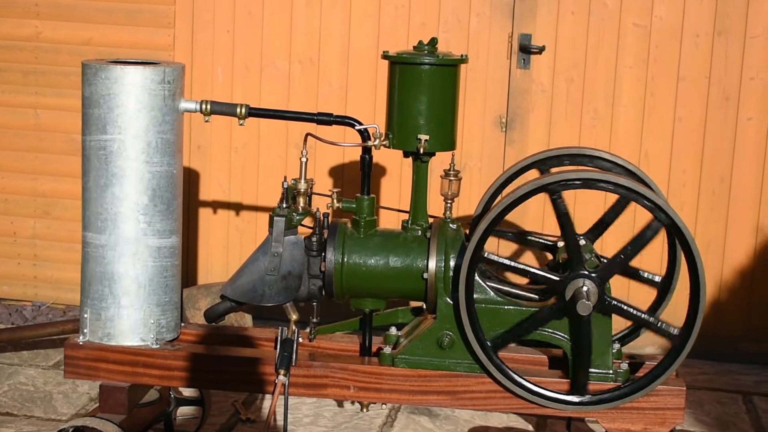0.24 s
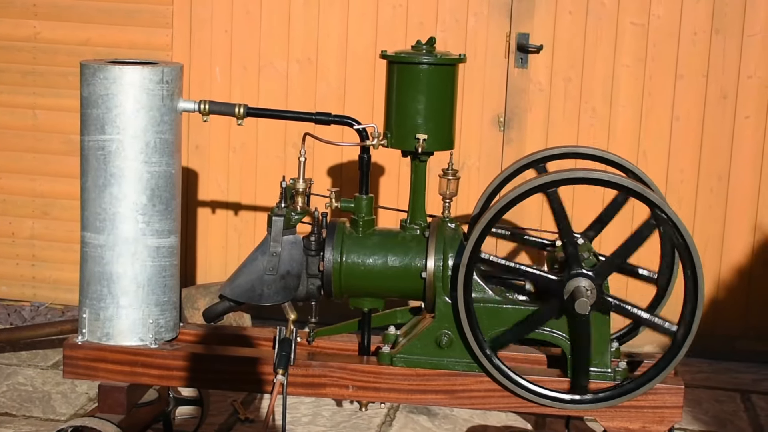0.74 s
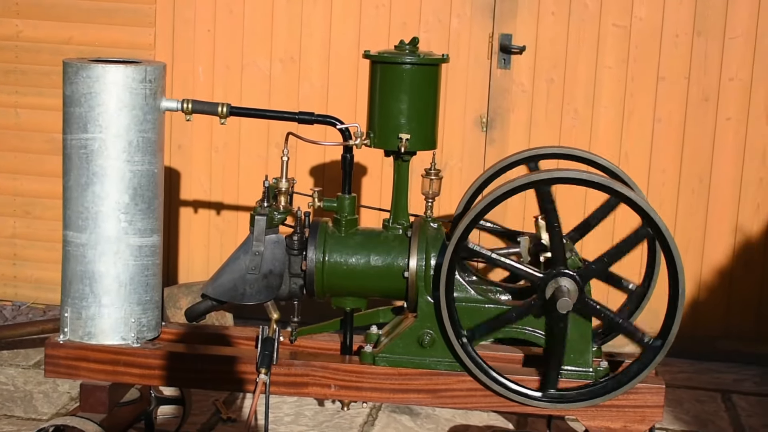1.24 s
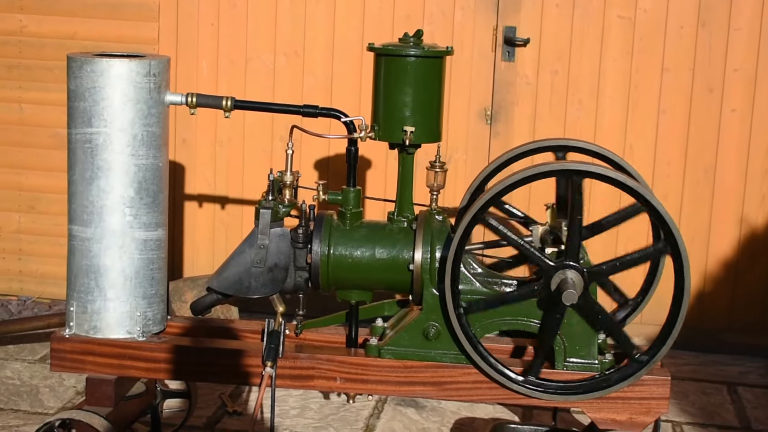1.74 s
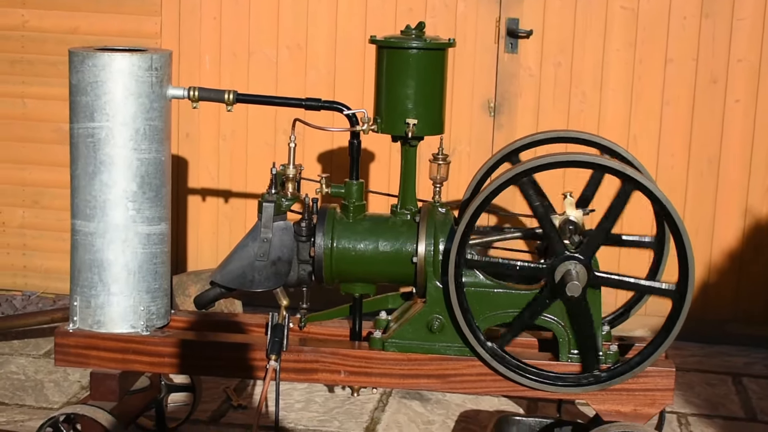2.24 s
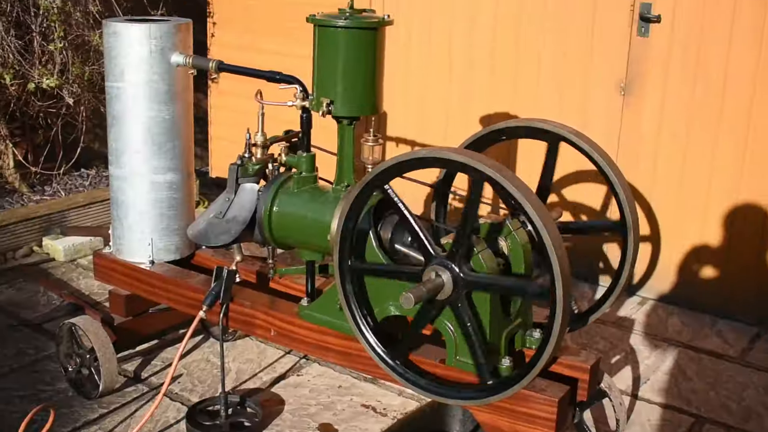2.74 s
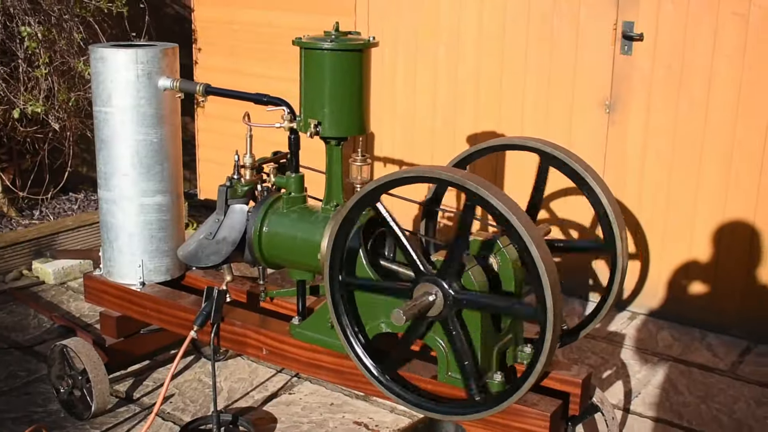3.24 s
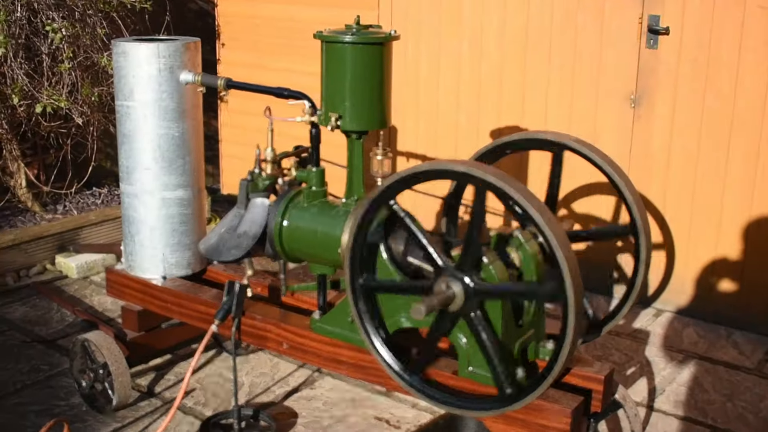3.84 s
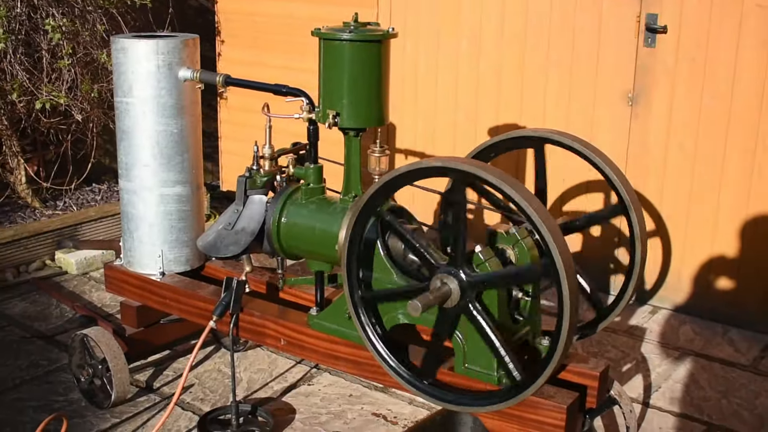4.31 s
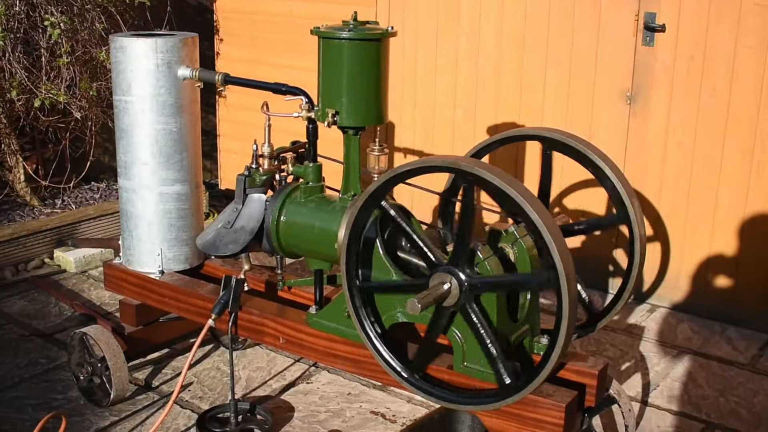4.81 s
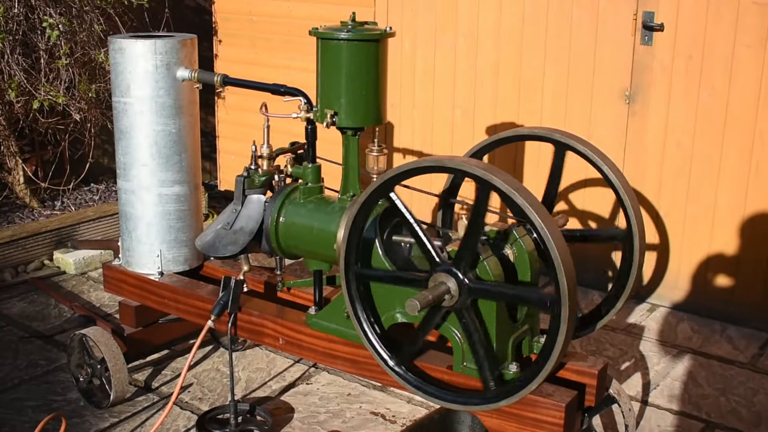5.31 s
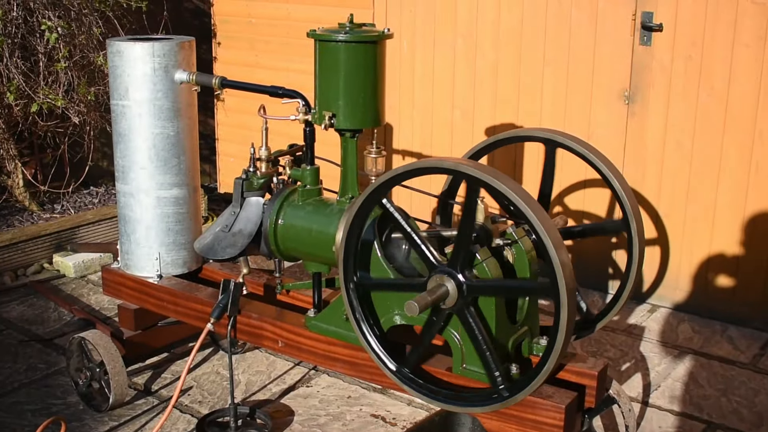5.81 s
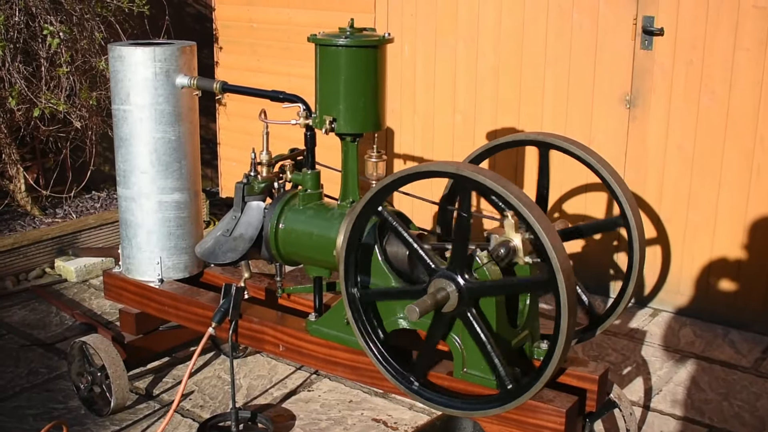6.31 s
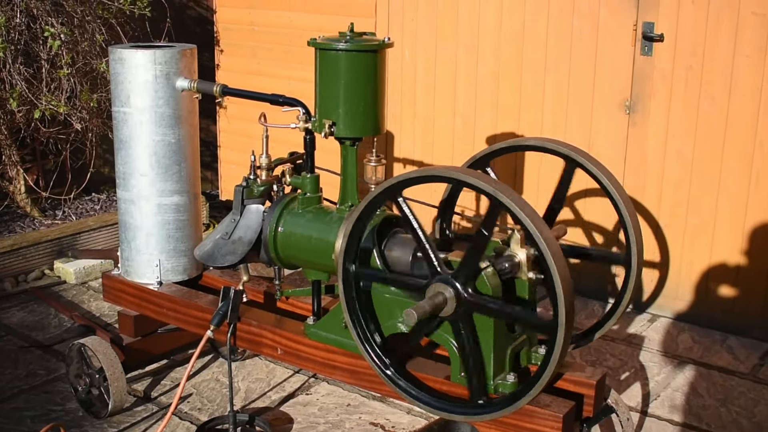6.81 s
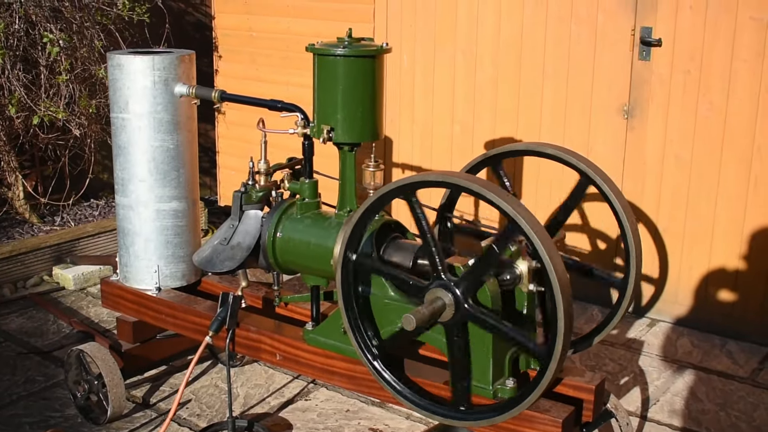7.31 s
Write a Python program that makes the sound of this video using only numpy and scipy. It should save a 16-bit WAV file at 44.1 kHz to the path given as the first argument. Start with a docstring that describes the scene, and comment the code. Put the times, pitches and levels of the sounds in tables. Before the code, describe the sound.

A small old oil engine barks and clatters about three times a second outdoors, over a roaring gas flame and low wind buffets.

```python
"""A small oil engine barks and clatters beside a wooden shed, over a roaring gas lamp and lumpy buffets of wind.
Each turn of the cam lifts the exhaust valve, the charge blows out (weakly when it did not fire), the lever
snaps back, air hisses in, loose steel jingles and the intake puffs: noise bursts through ringing filters,
plus gliding sines for thump, puff and timber hum. Wind and flame are coloured noise of wandering level.
The listening place changes once, at 2.5 s, and the sound drops out briefly there."""
import sys
import numpy as np
from scipy import signal
from scipy.fft import rfft, irfft, next_fast_len
from scipy.io import wavfile
from scipy.ndimage import uniform_filter1d, map_coordinates

SR = 44100
rng = np.random.default_rng(int(sys.argv[2]) if len(sys.argv) > 2 else 0)


def bounce(signal):
    """Save signal as a 16-bit WAV file at the path given by the first command-line argument."""
    frames = np.transpose(np.atleast_2d(signal))
    limited = np.clip(frames, -1, 1)
    pcm = np.round(limited * 32767).astype(np.int16)
    wavfile.write(sys.argv[1], SR, pcm)


N = 332955
MOVE_S = 2.5  # the listening place changes

# turns of the cam: (lever snap t/s, exhaust pressure/dB, snap force/dB, chatter/dB, rod clack/dB,
# pipe puff/dB, lag of clack, jingle and indrawn air/s); 0 = usual
TURNS = [(0.038, -2, -4, 0, -1.2, 0, .001), (0.3577, 0, 2.2, 1.5, 5, 0, .001),
         (0.6735, -3.5, -1.2, -2.5, 0, 0, .001), (0.9882, 1.5, 2.2, 2.2, -2.2, 0, -.002),
         (1.303, -1.2, 3, -2.2, -1.2, 0, .001), (1.6188, -1.2, -4, -2.2, 2.2, 0, 0),
         (1.94, -14, 5, -5, -5, 0, .002), (2.2637, 3, 2.2, 1.2, -6, 0, .005),
         (2.529, -15, -4, 2.5, -1.5, 1.2, 0), (2.85, 0.6, 0.6, 0, 4, -1.5, -.001),
         (3.1667, 0, 1.5, -1.2, 0, 2.2, -.003), (3.481, 0.6, 0, -2.5, 0, 1.2, 0),
         (3.7962, -1.2, -1.2, -2.2, 1.2, 0.6, -.001), (4.1088, 1.2, -4.5, 0.6, 0, 3, -.002),
         (4.4242, -6.5, 3, -1.2, 0, -7, .001), (4.7394, 2.5, -1.2, 2.5, 0.6, 1.5, -.003),
         (5.0516, -10.5, -0.6, 2.5, -4, -1.2, 0), (5.3646, 2.5, -3, 0, 2.2, -7, 0),
         (5.68, -7.5, 3.5, -1.2, -4.5, -1.2, .002), (5.9966, 1.5, -1.2, 2.2, 1.5, -2.5, -.003),
         (6.3157, -22, 2.2, -2.2, -3, -5, .003), (6.6395, -22, 2.2, -0.6, -9, 5.5, .011),
         (6.9703, -22, 3, 2.5, -4, -9, .004), (7.3016, 1.5, -3, -0.6, 0, -9, -.003)]
# ringing modes of the iron parts: (f/Hz, width/Hz, level/dB)
IRON_MODES = [(680, 70, -8), (1060, 30, -5), (1615, 60, -4), (1755, 50, -3), (2140, 80, -5), (2405, 55, -4),
              (2860, 70, -7), (3960, 200, -1), (4370, 55, -6), (5800, 120, -2), (8890, 150, -9),
              (9140, 50, -9)]
# ringing modes of the loose steel parts: (f/Hz, width/Hz, level/dB)
STEEL_MODES = [(360, 55, -3), (1615, 45, -5), (3235, 45, -3), (4490, 25, -3), (4885, 28, 1), (5420, 32, -2),
               (8620, 28, -3), (8712, 24, -1), (8960, 100, -5), (9638, 40, 0), (9835, 38, -1),
               (10135, 55, 0), (10320, 50, -3), (10565, 28, -2), (11300, 60, -9)]
# ringing modes of the lever: (f/Hz, width/Hz, level/dB)
LEVER_MODES = [(676, 20, -12.5), (2455, 290, 0.5), (5840, 44, -20), (7800, 44, -28), (8000, 32, -24),
               (8800, 40, -10), (10200, 31, -9), (11000, 33, -11), (11300, 31, -26), (12200, 49, -19),
               (13300, 56, -13), (14000, 48, -23)]
# broad colour of bright metal contacts: (f/Hz, level/dB per Hz)
BRIGHT_COLOUR = [(120, -49), (200, -1.5), (2290, -5), (2910, -10), (6170, -8), (6880, -23.5), (8420, -9),
                 (13300, -13), (16000, -23.5)]
# Every contact table below has the columns (turns after the snap, body level/dB, treble level/dB,
# body dB per dB of drive, treble dB per dB of drive, extra body/dB and extra treble/dB at the first place).


def amp(db):
    """Decibels to amplitude."""
    return 10 ** (np.asarray(db) / 20)


def unit(x):
    """Scale to an RMS of one."""
    return x / np.sqrt(np.mean(np.abs(x) ** 2) + 1e-20)


def along(points, hz):
    """Read (Hz, value) points along a log frequency axis."""
    f, v = np.transpose(points)
    return np.interp(np.log(hz + 1), np.log(f + 1), v)


def wobble(rate):
    """A smooth random curve with rate knots a second."""
    knots = rng.standard_normal(int(N * rate / SR) + 4)
    return map_coordinates(knots, [np.arange(N) * rate / SR])


def filtered(x, response):
    """Multiply the spectrum of x by a complex response of frequency."""
    m = next_fast_len(N + SR // 2)
    return irfft(rfft(x, m) * response(np.fft.rfftfreq(m, 1 / SR)), m)[..., :N]


def colour(spectrum, modes, ring_db):
    """A broad colour with ringing modes of alternating sign standing on it."""
    def response(f):
        ring = 0
        for k, (centre, width, db) in enumerate(modes):
            resonance = 1j * f * width / (centre * centre - f * f + 1j * f * width)
            ring = ring + (-1) ** k * amp(db) * resonance
        return amp(along(spectrum, f)) * (1 + amp(ring_db) * ring)
    return response


def force(s, db, attack, t60, hold):
    """Each contact rises over its attack, fades over t60 and lets go around hold (all in seconds)."""
    out, t = np.zeros(N + SR), np.arange(SR // 3) / SR
    shape = (1 - np.exp(-t / abs(attack))) * amp(-60 * t / t60) / (1 + (t / hold) ** 5)
    for start, level in zip(s, db):
        out[max(round(start * SR), 0):][:len(t)] += amp(level) * shape
    return out[:N]


def contacts(s, low_db, high_db, response, split_hz, attack, low_t60, high_t60, hold, grit_db, lead=0):
    """A burst of gritty noise at each time; lows and highs have their own strength and decay."""
    grit = unit(rng.standard_normal(N) * amp(grit_db * wobble(700)))
    low_push = force(s, low_db, attack, low_t60, 1.61 * hold)
    high_push = force(s - lead, high_db, attack, high_t60, hold + lead)  # the highs may come first

    def halves(f):
        whole = response(f)
        upper = 1 / (1 + (split_hz / (f + 1)) ** 8)
        return [unit(whole * np.sqrt(1 - upper)), unit(whole * np.sqrt(upper))]
    return filtered(grit * [low_push, high_push], halves).sum(0)


def tones(s, db, hz, attack, t60, glide):
    """A low resonance struck at each time, a little off pitch at random and gliding."""
    out, t = np.zeros(N + SR), np.arange(SR // 3) / SR
    for start, level, off in zip(s, db, rng.normal(0, 0.028, len(s))):
        phase = 2 * np.pi * hz * (1 + off) * (t + glide * t * t)
        envelope = amp(level - 60 * t / t60) * (1 - np.exp(-(t / attack) ** 2))
        out[round(start * SR):][:len(t)] += envelope * np.sin(phase)
    return out[:N]


def cam(part, body_drive, treble_drive, lag=0):
    """Times, body dB and treble dB of one contact in every turn; its moment stretches with the turn."""
    turn_at_move_s = 0.327  # length of the turn during which the listening place changes
    scatter_db = 1.2  # no two contacts are alike
    turns, body_db, treble_db, body_gain, treble_gain, first_body_db, first_treble_db = part
    snap = np.transpose(TURNS)[0]
    first = snap < MOVE_S
    length = np.where(first[:-1] != first[1:], turn_at_move_s, np.diff(snap))
    # contacts ahead of the snap belong to the turn before it
    length = np.r_[length[0], length] if turns < 0 else np.r_[length, length[-1]]
    s = snap + lag + turns * length
    scatter = scatter_db * rng.standard_normal((len(s), 2))
    body = body_db + body_gain * body_drive + first_body_db * first + scatter[:, 0]
    treble = treble_db + treble_gain * treble_drive + first_treble_db * first + scatter[:, 1]
    return s[s >= 0], body[s >= 0], treble[s >= 0]


def uneven(x, depth_db):
    """Every blow lands differently: random patches of the spectrum ring stronger or weaker."""
    z = signal.stft(x, nperseg=512)[2]
    patches = uniform_filter1d(uniform_filter1d(rng.standard_normal(z.shape), 3, 0), 5, 1)
    gain_db = depth_db * unit(patches) - depth_db ** 2 * np.log(10) / 20  # keeps the mean power
    return signal.istft(z * amp(gain_db), nperseg=512)[1][:N]


def first_place(x, points):
    """Until the listening place changes, x has another colour."""
    recoloured = filtered(x, lambda f: amp(along(points, f)))
    return np.where(np.arange(N) < MOVE_S * SR, recoloured, x)


def wind():
    """Lumpy gusts on the microphone over a light breeze; strong ones flap higher up."""
    # gusts: (peak t/s, level/dB, half length/s)
    gusts = [(0.162, -28.5, .06), (0.449, -16, 0.028), (.55, -34, .05), (0.647, -25.5, .03),
             (.83, -23, 0.043), (1.198, -22.5, 0.063), (1.284, -18, 0.038), (1.424, -30, 0.091),
             (1.667, -27, 0.07), (1.766, -21, 0.024), (1.857, -33, 0.071), (2.0, -37, .08),
             (2.621, -31, 0.029), (2.824, -20, 0.052), (6.266, -34, 0.025), (6.893, -19, 0.022),
             (6.972, -20, .045), (7.075, -32, 0.049), (7.306, -25.5, .04), (7.41, -30, .03),
             (7.506, -22.5, 0.034)]
    # low buffeting: (f/Hz, level/dB per Hz)
    buffet_colour = [(25, -16), (60, -5), (110, 1), (180, -2.5), (300, -17.5), (600, -24), (1500, -68)]
    # flapping above it: (f/Hz, level/dB per Hz)
    flap_colour = [(120, -25), (220, 5), (350, -3.5), (550, -14), (1200, -49)]
    t = np.arange(N) / SR
    push = amp(-42) + sum(amp(db) * np.exp(-((t - s) / half) ** 2) for s, db, half in gusts)
    lumps = amp(2.4 * wobble(35))

    def lumpy(points):
        return unit(lumps * filtered(rng.standard_normal(N), lambda f: amp(along(points, f))))
    rumble = lumpy(buffet_colour)
    flap = lumpy(flap_colour)
    return push * rumble + amp(4.5) * push ** 1.48 * flap


def shed(x, size=SR // 4):
    """Wall and paving answer, each frequency dying at its own speed; moving air and wheels keep changing it."""
    # decay of the answer: (f/Hz, t60/s)
    decay = [(200, 0.18), (2000, .24), (8000, 0.26), (14000, 0.067)]
    out = np.zeros(N + 2 * SR)
    for start in range(0, N, size):
        hz, t, z = signal.stft(rng.standard_normal(SR // 3), SR, nperseg=256)
        fade = amp(-60 * t / along(decay, hz)[:, None])
        tail = signal.istft(z * fade, SR, nperseg=256)[1]
        echo = signal.fftconvolve(x[start:start + size], tail / np.linalg.norm(tail))
        out[start + SR // 170:][:len(echo)] += echo  # the wall stands about a metre behind
    return out[:N]


def lamp():
    """The gas flame roars steadily and flutters: coloured noise under a randomly wandering level."""
    # flame roar: (f/Hz, level/dB per Hz)
    flame_colour = [(18, -41), (30, -7), (90, -4), (345, 1.5), (684, 0), (1070, -2), (1250, -7),
                    (1720, -6.5), (3980, -11), (7090, -17), (9970, -22.5), (13000, -25.5), (16000, -34)]
    roar = unit(filtered(rng.standard_normal(N), colour(flame_colour, IRON_MODES, ring_db=0.5)))
    return amp(-28 + 1.27 * wobble(9)) * roar


def trolley():
    """The timber frame hums briefly after the lever snaps, less after a slow turn."""
    # timber answering the lever: contact columns, body only
    boom = (0.015, -24, -25, 1.2, 0, -25, 0)
    usual_turn_s, slow_db_per_s = 0.315, -900
    snap, _, force_db, *_ = np.transpose(TURNS)
    late_s = np.maximum(np.diff(snap, prepend=0) - usual_turn_s, 0)
    drive_db = force_db + slow_db_per_s * late_s
    s, hum_db, _ = cam(boom, drive_db, drive_db)
    return tones(s, hum_db, hz=201.6, attack=0.0066, t60=0.35, glide=-0.11)


def intake():
    """Air rushes in as a short burst of hiss; later a rush of noise and a gliding pipe hoot puff out."""
    # air starts to hiss in: contact columns
    draw_contact = (0.198, -22, -27, 0.1, -0.1, 0.3, -0.6)
    # the pipe puffs: contact columns, body = pipe tone before its lift, treble = rush
    puff_contact = (0.625, -21, -24, 1, -0.4, -25, -25)
    # indrawn air: (f/Hz, level/dB per Hz)
    hiss_colour = [(470, -19), (800, -6), (1270, -5.5), (1590, -6), (3560, -1.5), (4510, -4), (7730, -5.5),
                   (8880, -4.5), (16000, -10)]
    # rush in the pipe: (f/Hz, level/dB per Hz)
    pipe_colour = [(250, -30), (450, 0), (750, 5), (1300, -10), (3000, -27)]
    _, pressure, *_, puff, lag = np.transpose(TURNS)
    s, low, high = cam(draw_contact, pressure, pressure, lag)
    draw = contacts(s, low, high, colour(hiss_colour, STEEL_MODES, ring_db=-6), split_hz=7150,
                    attack=0.0069, low_t60=1.4, high_t60=1.8, hold=0.076, grit_db=-1.0)
    s, tone_db, rush_db = cam(puff_contact, puff, pressure)
    breath = force(s, rush_db, attack=0.0045, t60=0.12, hold=0.037) * rng.standard_normal(N)
    rush = filtered(breath, lambda f: unit(amp(along(pipe_colour, f))))
    hoot = tones(s, tone_db + 8.5, hz=312, attack=0.0043, t60=0.078, glide=2.6)
    return draw + rush + hoot


def linkage():
    """Hard metal contacts of lever, rod, loose steel and valve seat: noise bursts through ringing modes."""
    # the pump lever snaps back: contact columns
    snap_contact = (0, -15, -20, 0.1, 1, 0.3, -5)
    # the rod takes up its play: contact columns
    clack_contact = (0.272, -16, -19, 1.1, 0.6, -0.6, -0.6)
    # loose steel parts chatter: contact columns
    jingle_contact = (0.357, -18, -16, 0.1, 1, -2.5, 0)
    # a valve seats: contact columns
    seat_contact = (0.603, -21, -27, 0.05, 0.05, -11, -6)
    # hollow knock of rod and seat: (f/Hz, level/dB per Hz)
    hollow_colour = [(150, -32), (250, -19.5), (576, -2), (1330, -7.5), (1640, -2.5), (2130, -12.5),
                     (7440, -6), (10000, 2), (16000, -28.5)]
    # chatter of loose steel: (f/Hz, level/dB per Hz)
    chatter_colour = [(150, -39), (250, -0.5), (618, -2), (1260, -18.5), (1760, 0), (2050, -10.5),
                      (4410, 0), (7570, -11), (8700, -0.5), (16000, -14)]
    _, pressure, force_db, chatter, play, _, lag = np.transpose(TURNS)
    s, low, high = cam(snap_contact, pressure, force_db)
    snap = contacts(s, low, high, colour(BRIGHT_COLOUR, LEVER_MODES, ring_db=7.5), split_hz=7700,
                    attack=0.00078, low_t60=0.21, high_t60=0.087, hold=0.054, grit_db=1.5)
    s, low, high = cam(clack_contact, play, play, lag)
    clack = contacts(s, low, high, colour(hollow_colour, STEEL_MODES, ring_db=12), split_hz=2750,
                     attack=0.0028, low_t60=0.16, high_t60=0.26, hold=0.036, grit_db=3.0)
    s, low, high = cam(jingle_contact, pressure, chatter, lag)
    jingle = contacts(s, low, high, colour(chatter_colour, STEEL_MODES, ring_db=10), split_hz=6960,
                      attack=0.0017, low_t60=0.27, high_t60=0.23, hold=0.034, grit_db=2.5)
    s, low, high = cam(seat_contact, pressure, pressure)
    seat = contacts(s, low, high, colour(hollow_colour, LEVER_MODES, ring_db=7), split_hz=5700,
                    attack=0.0022, low_t60=0.11, high_t60=0.09, hold=.03, grit_db=1.0)
    return snap + clack + jingle + seat


def exhaust():
    """The cam ticks and knocks the valve open; gas hisses ahead, then barks through the iron and thumps."""
    # the roller meets the cam: contact columns
    touch_contact = (-0.21, -33, -32, 0.15, 0.3, -20, -20)
    # the roller leaves the cam: contact columns
    leave_contact = (-0.119, -38, -34, 0, 0, -20, -20)
    # the exhaust valve is knocked open: contact columns
    lift_contact = (-0.173, -16.5, -16, 0.05, 0.15, -3, -6)
    # the exhaust blows out: contact columns
    blow_contact = (-0.119, -7, -15, 1, 1.7, 0, 0)
    # valve knock: (f/Hz, level/dB per Hz)
    knock_colour = [(350, -39), (600, -10.5), (1730, -5), (3680, -8), (5050, -2.5), (6920, -15.5),
                    (10500, -17), (16000, -46)]
    # escaping gas: (f/Hz, level/dB per Hz)
    gas_colour = [(29, -43), (50, -8), (1050, -3.5), (1580, -6), (1870, -7), (2160, -7), (3100, -7.5),
                  (4040, -1), (4670, -9.5), (9870, -20), (16000, -29)]
    pipe_farther_s = 0.0035  # the exhaust arrives later at the first place
    snap, pressure, *_ = np.transpose(TURNS)
    roller = [cam(part, pressure, pressure) for part in (touch_contact, leave_contact)]
    s, low, high = np.hstack(roller)
    tick = contacts(s, low, high, colour(BRIGHT_COLOUR, LEVER_MODES, ring_db=-3), split_hz=7000,
                    attack=0.0007, low_t60=0.045, high_t60=0.049, hold=0.0077, grit_db=6.0)
    s, low, high = cam(lift_contact, pressure, pressure)
    lift = contacts(s, low, high, colour(knock_colour, IRON_MODES, ring_db=4), split_hz=2960,
                    attack=0.0027, low_t60=.18, high_t60=0.09, hold=0.037, grit_db=3.0)
    s, low, high = cam(blow_contact, pressure, pressure, pipe_farther_s * (snap < MOVE_S))
    bark = contacts(s, low, high, colour(gas_colour, IRON_MODES, ring_db=11.5), split_hz=6000,
                    attack=0.0024, low_t60=0.17, high_t60=0.22, hold=0.018, grit_db=2.0, lead=0.0075)
    # the thump follows the strength of the bark, but less steeply
    thump = tones(s, 0.59 * low - 9, hz=159.5, attack=0.0024, t60=0.045, glide=-1.5)
    thump += tones(s, 0.29 * low - 12, hz=281.5, attack=0.0025, t60=0.057, glide=-1.04)
    return tick + lift + bark + thump


def scene():
    """The engine, lamp and their echo, coloured by where the listener stands, under the wind."""
    # the exhaust heard from the side, at the first place: (f/Hz, level/dB)
    side_on = [(200, 0), (900, 4), (1600, 0), (3300, 2), (3700, -3), (4050, -9), (4700, -2), (7000, 0)]
    # colour of engine, lamp and echo at the first place: (f/Hz, level/dB)
    first_spot = [(100, 6.5), (350, -0.5), (900, 0), (1700, 0), (3300, 1), (4100, 1), (6000, -0.5),
                  (9500, 3.5), (14000, 0.5)]
    works = first_place(exhaust(), side_on) + linkage() + intake() + lamp()
    engine = uneven(works, depth_db=2.5) + trolley()
    with_echo = engine + amp(-12.5) * shed(engine)
    return (first_place(with_echo, first_spot) + wind())[None]


def record(dry):
    """Peaks clip softly; the sound drops out at the change of place; nothing is kept above the band limit."""
    # dropout while the listening place changes: (t/s, level/dB)
    dropout = [(2.40, 0), (2.454, -5), (2.4565, -42), (2.482, -60), (2.483, -100), (2.52, -100),
               (2.522, -55), (2.534, -8), (2.56, 0)]
    top_hz = 15800  # full silence here, fading in over the 300 Hz below
    clipped = dry / (1 + np.abs(dry / .95) ** 6) ** (1 / 6)
    level_db = np.interp(np.arange(N) / SR, *np.transpose(dropout))
    return filtered(clipped * amp(level_db), lambda hz: np.clip((top_hz - hz) / 300, 0, 1))


dry = scene()
out = record(dry)
bounce(out)
```